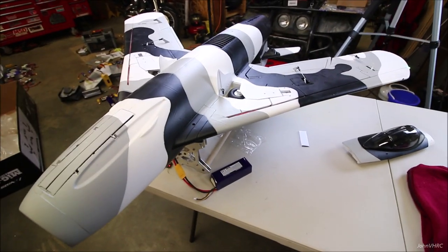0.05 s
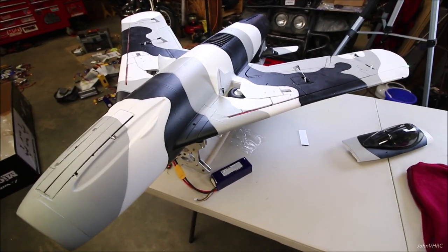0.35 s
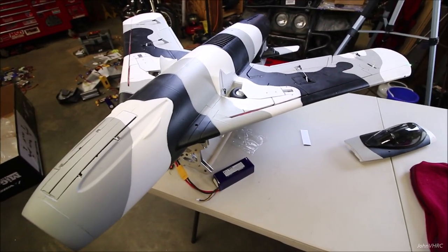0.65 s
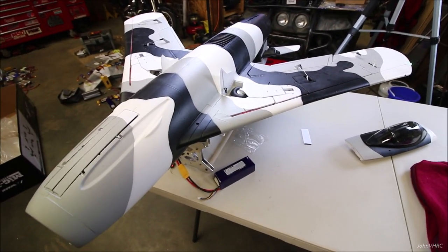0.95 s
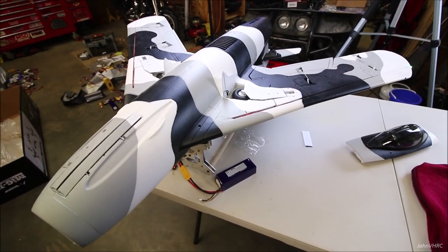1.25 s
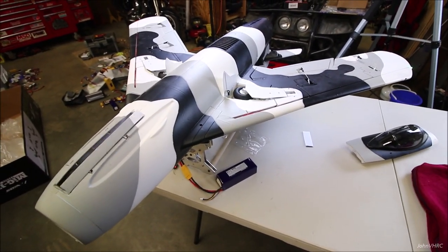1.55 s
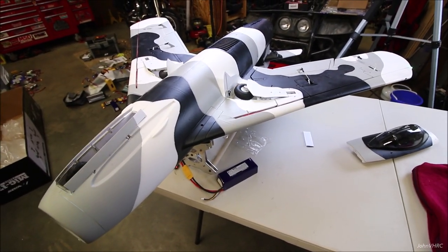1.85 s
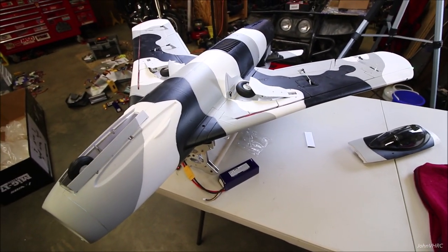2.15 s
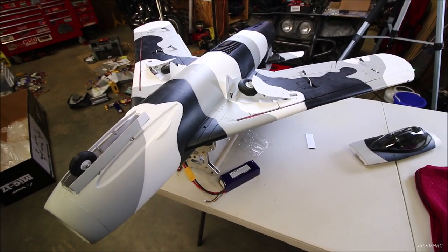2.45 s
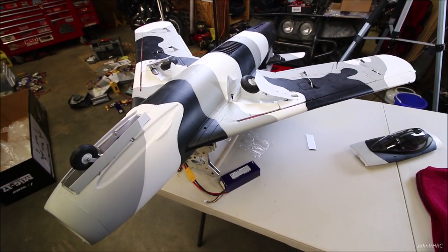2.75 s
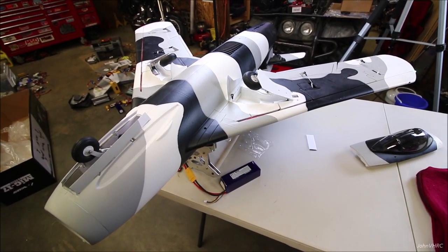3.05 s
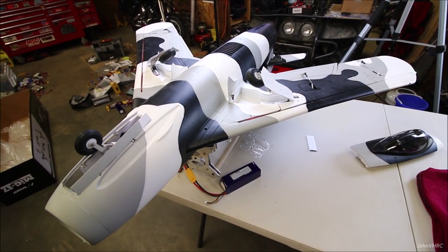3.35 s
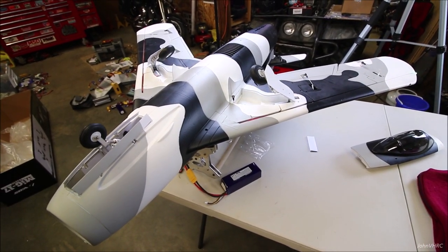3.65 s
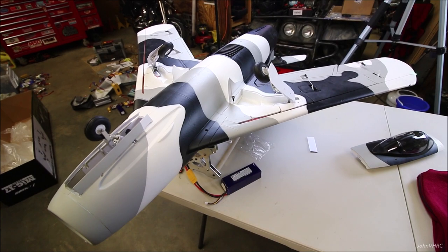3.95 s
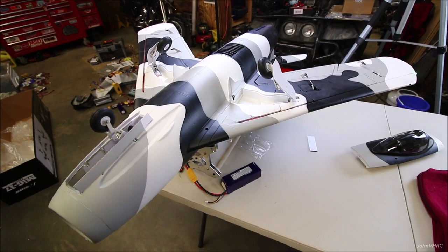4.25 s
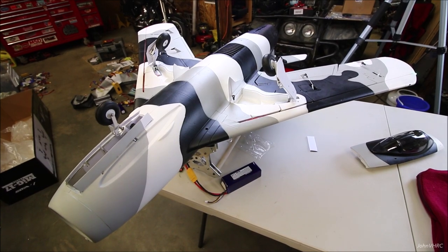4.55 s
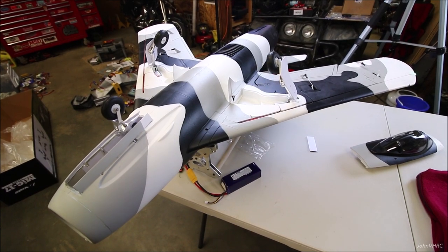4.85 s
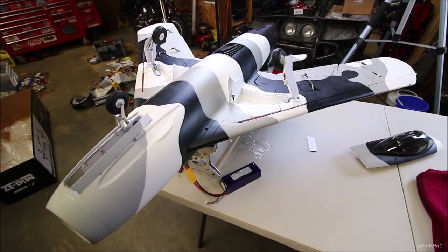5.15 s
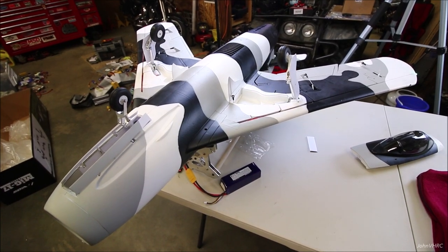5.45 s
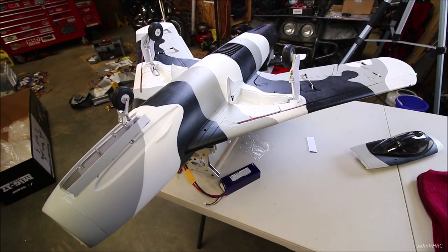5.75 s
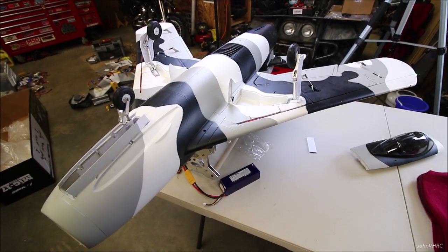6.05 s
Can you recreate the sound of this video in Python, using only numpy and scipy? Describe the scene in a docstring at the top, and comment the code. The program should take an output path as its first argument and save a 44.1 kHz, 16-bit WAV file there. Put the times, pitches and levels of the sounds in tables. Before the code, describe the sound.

Small geared motors start with a snap and keep up a buzzy, wavering whine, lowering a model plane's wheels indoors.

```python
"""A quiet workshop, where a foam model jet on a table lowers its landing gear at the click of a switch.
Three electric retract units (nose, near and far leg) start together. Each rotor hums at its shaft rate,
each gear train whines and rattles, and the hollow airframe radiates these forced vibrations.
The pitch sags as legs and doors load the motors, and the far gear case sings under the strain.
Linkages snap, gears scrape, hinge pins tick and foam doors bump, each with a short room reverberation."""
import sys
import numpy as np
from scipy import signal
from scipy.fft import rfft, irfft, next_fast_len
from scipy.io import wavfile
from scipy.ndimage import uniform_filter1d

SR = 44100
rng = np.random.default_rng(int(sys.argv[2]) if len(sys.argv) > 2 else 0)


def persist_wave(psi):
    """Save psi, clipped to +-1, as 16-bit WAV."""
    counts = np.round(np.clip(psi, -1, 1) * 32767).astype(np.int16)
    wavfile.write(sys.argv[1], SR, np.atleast_2d(counts).T)


N = 272979
T = np.arange(N) / SR
UNITS = ("nose", "near", "far")
START_S = .635  # all three motors start
IDLER_RATIO, IDLER_TEETH, PINION_TEETH = .37464, 14, 9  # the ratio is idler turns per shaft turn


def undb(db):
    """Amplitude ratio of a level: a factor of ten for every 20 dB."""
    return 10 ** (np.asarray(db) / 20)


def unit(x):
    """Normalisation to rms 1."""
    return x / np.sqrt(np.mean(x ** 2))


def curves(table):
    """Linear interpolation in time of each column after the first."""
    times, *columns = np.transpose(table)
    return [np.interp(T, times, column) for column in columns]


def response(hz, table):
    """Frequency response: the level in dB of a tone that slides through fixed resonances."""
    return np.interp(hz, *np.transpose(sorted(table)))


def colour(x, points, size=4096):
    """Minimum-phase filter through (f/Hz, gain/dB) points, made causal by folding the cepstrum."""
    hz, db = np.transpose(points)
    grid_hz = np.arange(size // 2 + 1) * SR / size
    gain = undb(np.interp(np.log(grid_hz + 1), np.log(hz), db))
    cepstrum = irfft(np.log(gain))
    cepstrum[1:size // 2] *= 2
    cepstrum[size // 2 + 1:] = 0
    return signal.fftconvolve(x, irfft(np.exp(rfft(cepstrum))))[:N]


def resonate(x, hz, width_hz):
    """Second-order resonator with gain 1 at its centre."""
    return signal.lfilter(*signal.iirpeak(hz, hz / width_hz, fs=SR), x)


def wander(per_s):
    """Slow random modulation of rms 1: straight lines between per_s random values a second."""
    hold = max(int(SR / per_s), 1)
    steps = np.repeat(rng.standard_normal(N // hold + 1), hold)
    return unit(uniform_filter1d(steps, hold)[:N])


def tone(turns, order, db):
    """Rotational order: a sinusoid at a multiple of a rotation rate, at an rms level."""
    return np.sqrt(2) * undb(db) * np.sin(2 * np.pi * (order * turns + rng.random()))


def reverberate(x, t60_s):
    """Diffuse reflections: convolution with exponentially decaying noise of unit energy."""
    t = T[:SR // 2]
    build_up = 1 - np.exp(-t / 0.0073)
    tail = rng.standard_normal(len(t)) * np.exp(-np.log(1000) * t / t60_s) * build_up
    return signal.fftconvolve(x, tail / np.sqrt(np.sum(tail ** 2)))[:N]


def spread(x, t60_s):
    """Mid-side stereo: direct sound in the middle; reflections off table and wings widen the treble."""
    # side signal relative to mid: f/Hz, gain/dB
    side_spectrum = [(60, -6.5), (250, -6.5), (500, -11.5), (1400, -8), (2500, -8.5), (4000, -2.5),
                     (8000, 1), (13000, 2.5)]
    side = colour(reverberate(x, t60_s), side_spectrum)
    return np.array([x + side, x - side])


def knocks(contacts, spectrum, room_t60_s=0.7, room_db=-4.5):
    """Source and filter: rough contacts are noise bursts, coloured by the body and echoed by the room."""
    force = np.zeros(N)
    for start_s, db, rise_s, decay_s in contacts:
        age = np.maximum(T - start_s, 0)
        envelope = (1 - np.exp(-age / rise_s)) * np.exp(-age / decay_s)
        force += undb(db) * envelope / envelope.max()
    grit = rng.standard_normal(N)
    direct = colour(force * grit, spectrum) / np.std(colour(grit, spectrum))
    room = np.array([reverberate(direct, room_t60_s) for _ in range(2)])
    return spread(direct, t60_s=0.016) + undb(room_db) * room


def ventilation(level_db=-57.5):
    """Broadband noise of moving air, strongest in the bass and wavering slightly."""
    # rumble and air: f/Hz, relative level/dB
    spectrum = [(20, -24), (50, -9.5), (80, -2), (125, 0.5), (180, -2), (280, -3.5), (600, -12),
                (1000, -14), (2000, -18.5), (5000, -21.5), (9000, -25), (16000, -32)]
    swell_db = .5 * wander(7.5)
    air = unit(colour(rng.standard_normal(N), spectrum))
    return spread(air * undb(level_db + swell_db), t60_s=0.17)


def transmitter_switch():
    """Impact transients: the switch clicks three times."""
    # contacts of the switch: t/s, level/dB, rise/s, decay/s
    contacts = [(.001, -42.5, 0.00056, 0.015), (.039, -50, .002, 0.0086), (.119, -43, 0.00079, 0.0045)]
    # response of the switch: f/Hz, gain/dB
    spectrum = [(300, -9), (1200, -15), (1700, -4), (2500, -3), (3400, -3), (4700, -7), (6500, -16),
                (16000, -39)]
    return knocks(contacts, spectrum)


def linkage_clicks():
    """Impulsive loading: the linkages click as they snap taut."""
    # snaps: t/s, level/dB, rise/s, decay/s
    snaps = [(.617, -39.5, 0.0045, 0.019), (.630, -31, .0005, 0.0027), (.963, -30.5, .001, 0.0043)]
    # response of the linkages: f/Hz, gain/dB
    spectrum = [(200, -15), (700, 20), (2000, 4), (4000, 4), (6000, -3), (8000, -4), (9400, -4),
                (10600, -7), (12000, -11), (16000, -15)]
    return knocks(snaps, spectrum)


def gear_scrapes():
    """Friction noise: the gears grind as the motors spin up."""
    # bursts of grinding: t/s, level/dB, rise/s, decay/s
    bursts = [(.622, -36.5, .012, 0.01), (.645, -33, 0.025, 0.0092), (.659, -33, 0.0017, 0.0051),
              (.672, -29, 0.0027, 0.012)]
    # response of the scraped gears: f/Hz, gain/dB
    spectrum = [(120, -22), (400, -9), (750, -7), (1200, 0), (2600, 3.5), (3500, -7), (5000, -19),
                (9000, -29), (16000, -33)]
    return knocks(bursts, spectrum)


def loaded_motor(index):
    """Speed falls as torque rises: a drive's shaft rate, with the judder and extra whine of its binds."""
    # shaft rates, sagging as each leg's weight comes on and recovering as it stands up: t/s, f/Hz
    nose_speed = [(0.74, 329.5), (0.93, 326.5), (1.26, 331.9), (1.73, 325.6), (2.0, 322.5), (2.7, 322.3),
                  (3.29, 324.1), (4.44, 325.1), (5.61, 331.1), (5.89, 328.9), (5.96, 327.3), (6.18, 328.3)]
    near_speed = [(0.74, 291.6), (1.21, 304.5), (1.32, 293.2), (1.55, 295.5), (1.76, 290.5), (1.98, 289.7),
                  (2.2, 284.4), (2.37, 288.3), (2.61, 283.7), (2.86, 287.6), (3.06, 284.9), (3.13, 287.8),
                  (4.04, 292.7), (4.63, 295.2), (5.35, 299.2), (6.18, 300.8)]
    far_speed = [(0.74, 288.2), (0.82, 288.6), (0.92, 280.2), (1.66, 277.4), (1.86, 268.7), (2.25, 263.1),
                 (2.49, 251.6), (3.09, 252.7), (3.55, 258.6), (4.12, 261.6), (4.66, 264.6), (5.31, 280.8),
                 (5.48, 279.1), (6.18, 281.1)]
    # a drive binds, slows and frees itself:
    # unit, t/s, sag/Hz, build-up/s, release/s, judder depth (0-1), whine change/dB
    binds = [("near", .95, 22, .16, .36, 0.54, -1.1), ("far", 1.0, 1, 0.078, 0.061, 0.28, 3),
             ("far", 1.35, 1, .06, .12, 0.097, 4.9), ("near", 1.654, .3, 0.069, .12, 0.049, 2.7),
             ("far", 2.48, 4.6, .21, 0.09975, .1, -3), ("nose", 2.59, 35, .36, .1, 0.36, -1.1),
             ("far", 2.93, 11.4, .17, .14, .1, -6), ("far", 3.42, 8.4, .21, .1, 0.098, -1),
             ("far", 3.87, 8.2, .23, .13, .1, -2.03), ("far", 4.31, 4.3, .23, 0.1803, 0.093, -1.03),
             ("far", 4.965, 0.49, 0.037, 0.042, .1, 5.3), ("far", 5.11, 0.51, 0.093, 0.068, 0.098, 5.4),
             ("far", 5.41, 0.52, 0.082, 0.039, .1, 5.5), ("far", 5.535, 1.17, 0.061, 0.052, .1, 10.6),
             ("far", 5.645, .5, .05, 0.043, .1, 5.7)]
    hz, = curves((nose_speed, near_speed, far_speed)[index])
    judder, bind_db = np.zeros(N), np.zeros(N)
    for name, peak_s, sag_hz, build_s, release_s, depth, db in binds:
        if name == UNITS[index]:
            ramp = np.interp(T, [peak_s - build_s, peak_s, peak_s + release_s], [0, 1, 0])
            grip = np.sin(np.pi / 2 * ramp) ** 2
            hz = hz - sag_hz * grip
            judder += depth * grip
            bind_db += db * grip
    return hz, judder, bind_db


def rotor_hum(index, turns, hz, sag_hz, build_s=0.061, second_db=-60.5, growth_db_per_hz=0.1935):
    """Forced vibration: unbalance drives the airframe at the shaft rate, torque ripple at three times it."""
    # unbalance as the airframe radiates it at each shaft rate: f/Hz, level/dB
    hum_response = [(110, -78), (225, -56), (241, -48.5), (250, -41.5), (258, -37), (263, -39.5),
                    (269, -44), (276, -40.5), (286, -57.5), (292, -48), (300, -52.5), (321, -39.5),
                    (325, -42.5), (329, -39.5), (332, -41)]
    # the near motor hums louder while its leg still lies against the wing: t/s, gain/dB
    wing_coupling = [(1.6, 2.5), (2.1, -2)]
    # torque ripple of the three-pole rotors: t/s, then level/dB for nose, near, far
    torque_ripple = [(.62, -65, -70, -70), (.73, -38, -66, -55), (1.5, -43, -64, -55),
                     (2.0, -51, -74, -48.5), (2.4, -41.5, -48, -56), (2.85, -52.5, -71, -56.5),
                     (4.3, -51.5, -57.5, -48.5), (5.4, -47, -58, -47), (6.19, -47.5, -52, -45)]
    # higher shaft harmonics: order, then level/dB for nose, near, far
    harmonics = [(5, -51.5, -48, -50), (6, -50, -55, -50.5), (8, -59, -74, -59), (9, -59.5, -55, -60),
                 (15, -67, -63, -60)]
    hum_db = response(hz, hum_response)
    if UNITS[index] == "near":
        hum_db += curves(wing_coupling)[0]
    build_up = np.clip((T - START_S) / build_s, 0, 1) ** 2
    hum = build_up * tone(turns, 1, hum_db + .5 * wander(24.9))
    hum += tone(turns, 3, curves(torque_ripple)[index] + 2.2 * wander(30))
    if UNITS[index] == "nose":  # its second harmonic grows with load
        hum += tone(turns, 2, second_db + growth_db_per_hz * sag_hz + 1.3 * wander(30))
    for order, *levels_db in harmonics:
        hum += tone(turns, round(order), levels_db[index] + 3 * wander(12))
    return hum


def slack_teeth(drop_db=-20, fade_s=0.053):
    """Backlash, as a gain in dB: the whine drops while the teeth run slack and squeals as they bite."""
    # slack spells of the near leg: start t/s, end t/s, bite gain/dB, bite length/s
    spells = [(.55, 0.803, 5.5, 0.17), (1.145, 1.275, 2, 0.15)]
    gain_db = np.zeros(N)
    for start_s, end_s, bite_db, bite_s in spells:
        gain_db += drop_db * np.clip(np.minimum(T - start_s, end_s - T) / fade_s + .5, 0, 1)
        gain_db += bite_db * np.sin(np.pi * np.clip((T - end_s) / bite_s, 0, 1))
    return gain_db


def gear_whine(index, idler_turns, hz, seating, base_db, judder, stutter=0.98, chatter=0.19):
    """Amplitude modulation: tooth-mesh tones, shaken by stick-slip in a bind and by backlash chatter."""
    # airframe resonances that the mesh frequency slides through: f/Hz, gain/dB
    mesh_response = [(1250, -10), (1315, 0.5), (1355, -2), (1380, 2.5), (1403, -2.5), (1428, 3),
                     (1450, -1.5), (1470, 1), (1495, -0.5), (1550, 0)]
    # mesh tones and once-a-turn sidebands: idler order, then relative level/dB for nose, near, far
    mesh_orders = [(13, -17, -16, -12), (14, -0.5, 0, 1.5), (15, -14.5, -16, -18), (28, -18, -22.5, -20)]
    whine_db = base_db + response(hz * IDLER_RATIO * IDLER_TEETH, mesh_response)
    if UNITS[index] == "near":
        whine_db += slack_teeth()
    once_a_turn = np.sin(2 * np.pi * idler_turns + 1.7 * wander(40))
    stick_slip = stutter * wander(38)
    shake = judder * (once_a_turn + stick_slip) + chatter * wander(160)
    force = seating * undb(whine_db + 0.85 * wander(21.93)) * (1 + shake)
    return force * sum(tone(idler_turns, round(order), levels_db[index] + 0.96 * wander(15))
                       for order, *levels_db in mesh_orders)


def tooth_taps(turns, teeth, wear, scatter_db):
    """Impulse train, one tap per tooth: each tooth's own error repeats every turn, plus chance play."""
    passed = turns * teeth
    at = np.flatnonzero(np.diff(np.floor(passed)) > 0)
    fraction = (np.floor(passed[at + 1]) - passed[at]) / (passed[at + 1] - passed[at])
    error = rng.standard_normal(teeth)
    error = unit(error - error.mean())
    play, scatter = rng.standard_normal((N // 16, 2))[:len(at)].T
    strength = wear * error[np.arange(len(at)) % teeth] + play * undb(scatter_db * scatter)
    taps = np.zeros(N)
    for k in range(-3, 5):  # a windowed sinc places each tap between samples
        taps[np.clip(at + k, 0, N - 1)] += strength * np.sinc(k - fraction) * np.sinc((k - fraction) / 4)
    return unit(taps)


def retract_unit(index, spin_up_s=.039, start_share=.33, flutter=0.00101):
    """Rigid gearing: one shaft rotation times a unit's hum, whine, tooth taps and brush taps."""
    # nose, near and far drive: free-running f/Hz, sag that seats the teeth/Hz, base whine level/dB
    drives = [(330.3, 11, -31), (301.65, 3.74, -30.5), (290.3, 5.6, -39)]
    free_hz, seat_hz, whine_db = drives[index]
    loaded_hz, judder, bind_db = loaded_motor(index)
    sag_hz = np.maximum(free_hz - loaded_hz, 1)
    age = np.maximum(T - START_S, 0)
    hz = loaded_hz * (1 - (1 - start_share) * np.exp(-(age / spin_up_s) ** 2))
    turns = np.cumsum(hz * (1 + flutter * wander(45))) / SR
    idler_turns = turns * IDLER_RATIO
    seating = 1 - np.exp(-sag_hz / seat_hz)  # load presses the teeth together
    hum = rotor_hum(index, turns, hz, sag_hz)
    whine = gear_whine(index, idler_turns, hz, seating, whine_db + bind_db, judder)
    teeth = tooth_taps(idler_turns, IDLER_TEETH, wear=0.31, scatter_db=-1.5)
    brushes = tooth_taps(turns, PINION_TEETH, wear=.45, scatter_db=1.5)
    fade_in = np.minimum(age / .02, 1)
    return fade_in * (hum + whine), teeth, brushes, idler_turns, hz


def gear_rasp(teeth, brushes, rattle_trim_db=-2.5, hiss_trim_db=-2):
    """Structure-borne sound: taps become rattle, hiss and drone, and excite the modes of cases and struts."""
    # tooth rattle before its trim: t/s, level/dB
    rattle_levels = [(0.72, -42), (0.86, -33.5), (1.46, -37.5), (1.5, -31.5), (1.71, -34), (2.16, -32),
                     (4.93, -34), (4.96, -36), (5.9, -38), (6.18, -36.5)]
    # brush hiss before its trim, and airframe drone: t/s, hiss level/dB, drone level/dB
    whirr_levels = [(0.7, -49, -44.5), (1.36, -48, -42), (2.29, -46.5, -42.5), (2.56, -47, -38.5),
                    (3.1, -46, -43.5), (5.85, -46, -44.5), (6.19, -46.5, -43.5)]
    # responses that shape tooth rattle, brush hiss and airframe drone: f/Hz, gain/dB
    rattle_spectrum = [(600, -33.5), (1150, -13), (1400, -2), (1600, -1), (1850, -0.5), (2100, -0.5),
                       (2300, -5), (2600, -6), (2950, -6), (3400, -10.5), (3800, -18), (4600, -23),
                       (6500, -37.5)]
    hiss_spectrum = [(2000, -16.5), (3800, 0.5), (4800, 0), (5900, -6.5), (7100, -8.5), (8200, -10),
                     (11000, -14), (13000, -18), (16000, -30.5)]
    drone_spectrum = [(40, -45), (90, -13), (200, -10), (310, -0.5), (410, -1), (470, -13.5), (560, -1.5),
                      (680, -1.5), (800, 7.5), (930, 7), (1040, 9), (1150, 11), (1300, 7.5), (1900, -27.5)]
    # modes of the gear cases and struts: f/Hz, bandwidth/Hz, gain/dB relative to the plain rasp
    modes = [(2080, 190, -5.5), (2396, 140, 2.5), (3588.5, 85, -1), (4190, 250, -8.5), (4710, 150, -3.5),
             (5320, 130, -3), (5940, 190, -5), (7020, 650, -8), (8800, 340, -9.5), (13960, 300, -6)]
    rattle_db, = curves(rattle_levels)
    hiss_db, drone_db = curves(whirr_levels)
    rattle = unit(colour(teeth, rattle_spectrum)) * undb(rattle_db + rattle_trim_db + 0.9 * wander(35))
    hiss = unit(colour(brushes, hiss_spectrum)) * undb(hiss_db + hiss_trim_db + 0.8 * wander(40))
    drone = unit(colour(teeth + brushes, drone_spectrum)) * undb(drone_db)
    rasp = rattle + hiss + drone
    return rasp + sum(undb(db) * resonate(rasp, hz, width_hz) for hz, width_hz, db in modes)


def landing_gear(balance_db=(-1.5, .2, -1.5), side_db=-12):
    """Superposition of the three units, their tones placed by level (left minus right) and by phase."""
    tones, teeth, brushes, idler_turns, speeds = zip(*(retract_unit(i) for i in range(len(UNITS))))
    far = UNITS.index("far")
    singing = singing_case(teeth[far], idler_turns[far], speeds[far])
    rasp = gear_rasp(sum(teeth), sum(brushes))
    fade_in = np.interp(T, [.64, .70], [0, 1])
    panned = sum(x * undb(np.array([[db], [-db]]) / 2) for x, db in zip(tones, balance_db))
    # a side signal in quadrature puts left and right slightly out of step
    side = undb(side_db) * np.imag(signal.hilbert(sum(tones), next_fast_len(N))[:N])
    return spread(fade_in * (rasp + singing), t60_s=0.32) + panned + np.array([side, -side])


def hinge_ticks():
    """Small stiff bodies ring high: the metal hinge pins tick in the upper treble."""
    # contacts of the pins: t/s, level/dB, rise/s, decay/s
    contacts = [(.695, -45, .0005, .002), (.953, -41, .001, .005), (.964, -44, .001, 0.0042),
                (.976, -44, .001, 0.0065), (1.022, -48, .0005, .003), (1.304, -48, .0005, 0.0054)]
    # response of the pins: f/Hz, gain/dB
    spectrum = [(2000, -30), (6500, -11), (8500, -5), (9600, -2), (10900, -3), (11800, -14), (14000, -11),
                (16000, -20)]
    return knocks(contacts, spectrum)


def door_thuds():
    """Soft, damped impacts carry little treble: the foam doors bump."""
    # bumps: t/s, level/dB, rise/s, decay/s
    bumps = [(.954, -24, 0.0014, 0.0052), (.963, -28, 0.00087, 0.0017), (.978, -44, 0.0015, 0.018),
             (1.148, -38, 0.0059, 0.015)]
    # response of the doors: f/Hz, gain/dB
    spectrum = [(30, -30), (60, -22), (90, 0), (130, -15), (200, 0), (450, 0.5), (700, 2.5), (1100, 3),
                (1800, -3), (5000, -39)]
    return knocks(bumps, spectrum)


def singing_case(teeth, idler_turns, shaft_hz, mode_hz=2604, width_hz=68, level_db=-41.5):
    """Resonance: under strain the second mesh harmonic, its lower sideband and the taps ring the case."""
    strain_hz, knee_hz = 271.2, 2.6  # it sings once the motor is dragged below this shaft rate
    harmonic = tone(idler_turns, 2 * IDLER_TEETH, 3.2 * wander(40))
    sideband = tone(idler_turns, 2 * IDLER_TEETH - 1, -0.5 + 3.2 * wander(40))
    ring = unit(resonate(harmonic + sideband, mode_hz, 2 * width_hz))
    rattle = undb(-7) * unit(resonate(teeth, mode_hz, width_hz))
    strain = (1 + np.tanh((strain_hz - shaft_hz) / (2 * knee_hz))) / 2
    return unit(ring + rattle) * strain * undb(level_db)


def scene():
    """Sound pressures add: the running gear, its knocks and ticks, and the workshop's ventilation."""
    gear = landing_gear()
    contacts = door_thuds() + linkage_clicks() + hinge_ticks() + gear_scrapes() + transmitter_switch()
    return gear + contacts + ventilation()


def record(dry, cutoff_hz=15800):
    """Level difference between channels: bass leans right, treble left; a low-pass cuts the top."""
    # left minus right: f/Hz, level/dB
    lean = [(100, -3.0), (500, -0.35), (1500, 0.0), (2500, -0.4), (5000, 1), (13000, 1.5)]
    left = colour(dry[0], [(hz, db / 2) for hz, db in lean])
    right = colour(dry[1], [(hz, -db / 2) for hz, db in lean])
    low_pass = signal.ellip(10, .2, 80, cutoff_hz, fs=SR, output="sos")
    return signal.sosfilt(low_pass, np.array([left, right]))


dry = scene()
out = record(dry)
persist_wave(out)
```